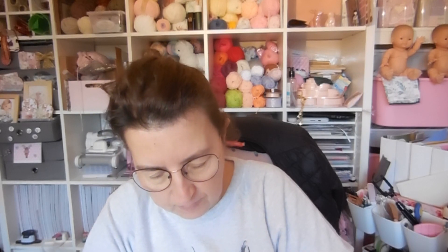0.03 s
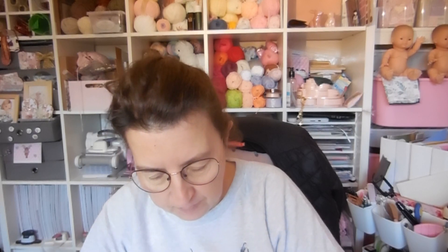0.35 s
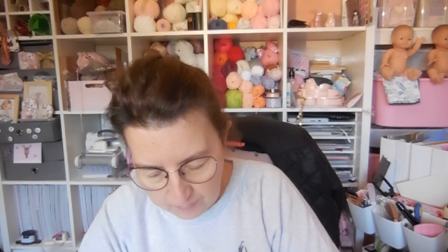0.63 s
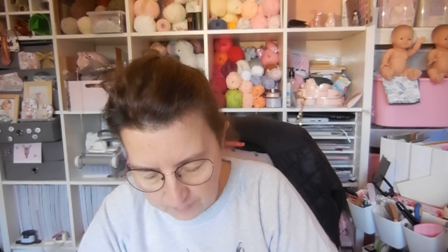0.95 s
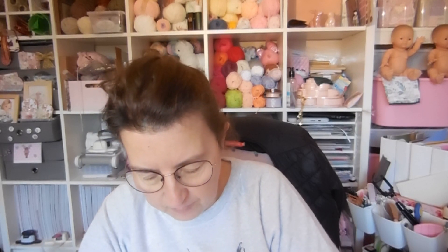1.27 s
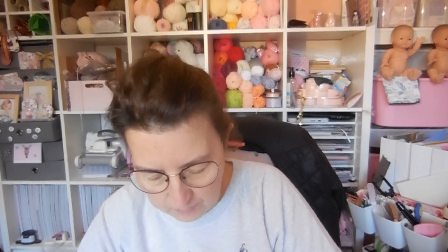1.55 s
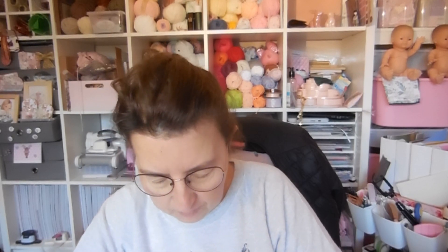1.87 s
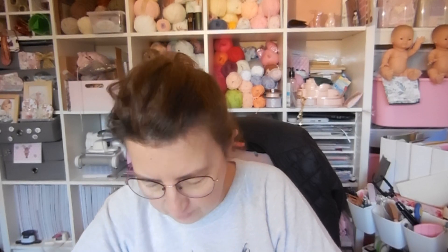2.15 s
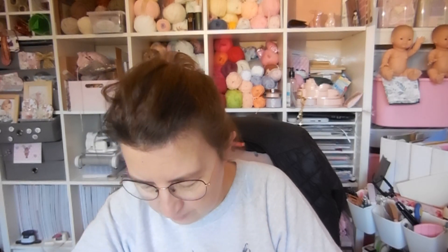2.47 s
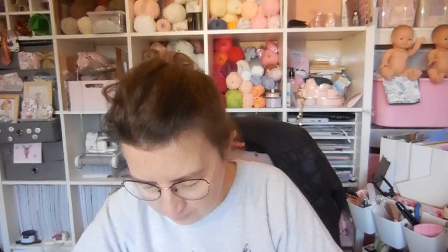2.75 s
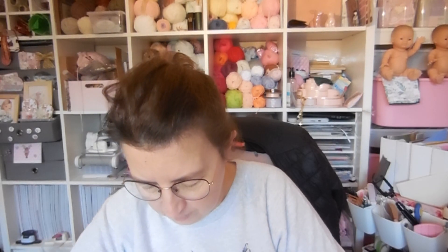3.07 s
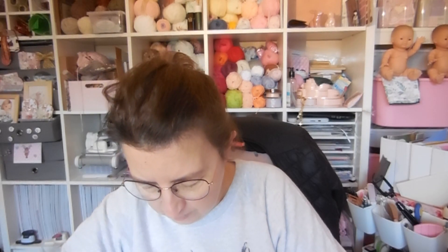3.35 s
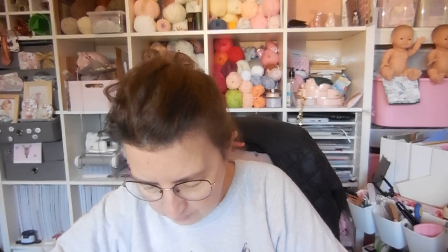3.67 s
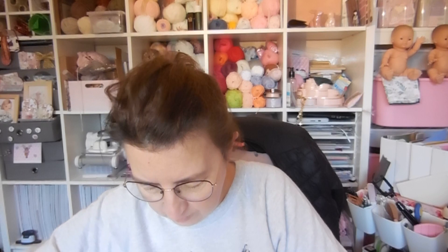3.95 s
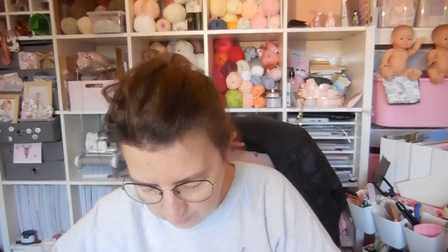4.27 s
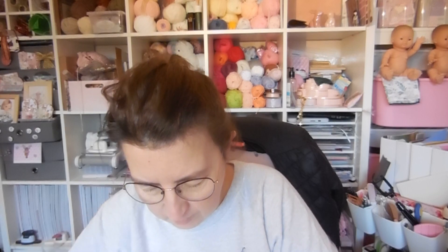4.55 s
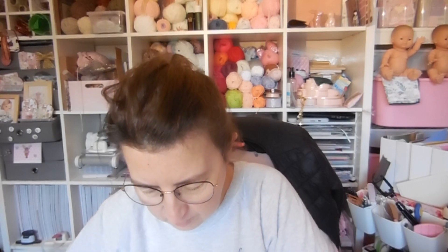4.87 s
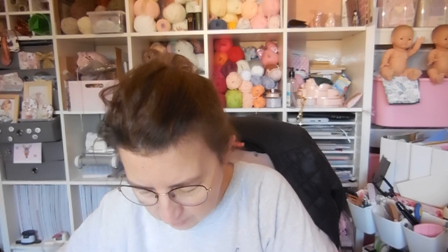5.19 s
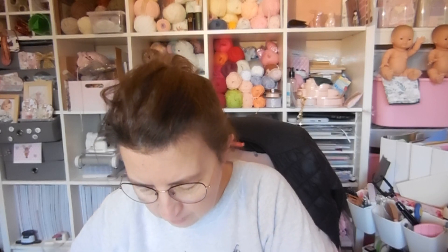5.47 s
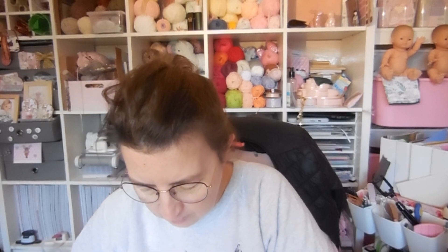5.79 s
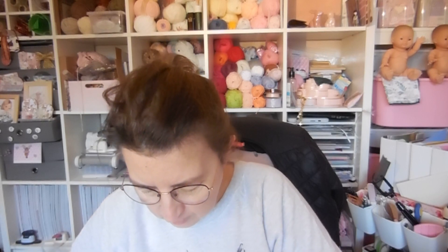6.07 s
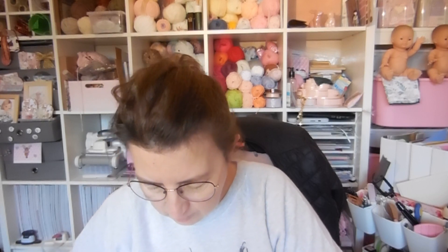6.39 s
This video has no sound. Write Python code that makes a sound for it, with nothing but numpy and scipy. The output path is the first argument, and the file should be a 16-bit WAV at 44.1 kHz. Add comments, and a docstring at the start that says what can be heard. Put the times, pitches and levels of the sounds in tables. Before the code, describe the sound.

Stiff paper crackles and rustles close to a stereo microphone as a small parcel is unwrapped in a quiet, cluttered room. Light crinkles grow into irregular bursts of crisp clicks, crunching folds and the hiss of paper sliding on paper. The handling eases briefly, comes back at its busiest, then softens a little. A few faint, low bumps come from the nudged parcel.

```python
"""Stiff wrapping paper crackles as a small parcel is unwrapped at a desk, close to two microphones.
Creases loaded by the hands buckle and release their elastic energy as clicks, singly and in crunching
runs. Friction makes the sheet hiss, its flexing pushes air, and the nudged parcel bumps softly.
The desk and shelves of the cluttered room return brief reflections over a faint hush."""
import sys
import numpy as np
from scipy import signal
from scipy.fft import rfft, irfft, next_fast_len
from scipy.io import wavfile
from scipy.ndimage import uniform_filter1d, minimum_filter1d, map_coordinates

SR = 44100
rng = np.random.default_rng(int(sys.argv[2]) if len(sys.argv) > 2 else 0)


def transcribe(u):
    """Save the signal u as a 16-bit wav file named by the first command-line argument.

    u: samples, shape (n,) or (channels, n), limited to [-1, 1]; the rate is SR.
    q: integer samples, one column per channel.
    """
    v = np.clip(np.atleast_2d(u).T, -1, 1)
    q = np.round(v * 32767).astype(np.int16)
    wavfile.write(sys.argv[1], SR, q)


N = 283563
TIME = np.arange(N) / SR
HAND_TIME = TIME[::64]  # coarse grid for the slow motion of the hands

# Pulls and pushes on the paper; all levels are relative. Each row: start in seconds, length in seconds,
# level in dB, swell in dB, crispness in dB per octave, ring of taut panels in dB, flexing in dB.
HAND_STROKES = [(-0.025, 0.13, -43, -6, 0, 1, -27), (0.135, 0.14, -34, -9, -0.9, -2, -29),
                (0.339, 0.035, -38, -3, -1, -3, -26), (0.447, 0.069, -44.5, 4, -1.5, -1.5, -24),
                (0.625, 0.28, -42.5, -2, -0.9, -2, -24), (0.931, 0.11, -27, 7.5, 0.5, 0, -25),
                (1.068, 0.14, -25, -0.5, 0.7, 1.5, -22), (1.246, 0.063, -27.5, -10.5, 0.5, -1, -21),
                (1.334, 0.042, -21.5, 2.5, 0.8, 2, -25), (1.421, 0.29, -35.5, -18, -0.4, -2, -27),
                (1.68, 0.16, -35, -1, -0.1, -0.5, -32), (1.795, 0.38, -29.5, -2, -0.5, -2, -24.5),
                (2.216, 0.13, -44, 1, -0.5, -5, -20.5), (2.38, 0.14, -36.5, 2, 0.1, -1.5, -24),
                (2.544, 0.13, -28.5, -4.5, -0.5, -2, -29), (2.69, 0.1, -31.5, 3.5, 0.5, -0.5, -25),
                (2.817, 0.29, -37.5, -7, 0, -1, -23), (3.051, 0.1, -30, 1.5, 0.1, -3, -22.5),
                (3.217, 0.35, -29.5, -6.5, -0.5, -1, -23), (3.481, 0.2, -25.5, 6, -0.5, -3.5, -18.5),
                (3.675, 0.22, -25, -5, 0.3, -2, -19), (3.975, 0.18, -25.5, 16.5, 1.5, -1.5, -23),
                (4.246, 0.052, -34, -3, 0.3, -1, -22), (4.485, 0.066, -53.5, 14, 0, -3.5, -25),
                (4.579, 0.063, -28, -3.5, -1.2, -3.6, -19), (4.648, 0.22, -27.5, 2, -0.1, -2, -20.5),
                (4.858, 0.15, -21.5, -4, 0.8, -2.5, -17), (5.032, 0.25, -21.5, -5, 0.2, -1, -16),
                (5.304, 0.09, -27.5, -7.5, 0.5, 0, -18.5), (5.458, 0.14, -27.5, 9, 0.5, 1.5, -17.5),
                (5.677, 0.38, -35, -18.5, 0, 0, -19.5), (6.005, 0.16, -32, 6, 0, -0.5, -18),
                (6.183, 0.077, -36, 6, 0, -1, -16), (6.345, 0.084, -34, 15, -1, -0.5, -18)]
# Folds collapsing in runs of tiny buckles. Each row: middle in seconds, level in dB, length in seconds.
FOLD_COLLAPSES = [(0.04, -54, 0.029), (0.118, -31.5, 0.026), (0.321, -29.5, 0.0073), (0.546, -39.5, 0.037),
                  (0.72, -34, 0.023), (0.726, -25, 0.032), (0.839, -30.5, 0.024), (0.94, -23.5, 0.014),
                  (1.005, -23, 0.039), (1.175, -22.5, 0.012), (1.394, -19.5, 0.022), (1.498, -27, 0.015),
                  (1.703, -23.5, 0.015), (1.848, -27, 0.023), (2.4, -28.5, 0.047), (2.474, -20.5, 0.018),
                  (2.77, -30.5, 0.029), (2.884, -31.5, 0.017), (3.022, -29, 0.02), (3.213, -34, 0.017),
                  (3.333, -19, 0.0063), (3.865, -16.5, 0.017), (3.967, -24, 0.026), (4.023, -15.5, 0.044),
                  (4.162, -24, 0.034), (4.229, -29.5, 0.013), (4.39, -36, 0.0054), (4.59, -26.5, 0.033),
                  (5.12, -18, 0.054), (5.682, -27, 0.022)]
# Big creases snapping through. Each row: time in seconds, level in dB, crispness in dB per octave,
# note of the flipping facet in Hz.
BIG_CREASES = [(0.0315, -28.5, 0, 10500), (0.0427, -32, -7, 2160), (0.078, -28.5, 0, 6360),
               (0.1106, -33, -1, 3980), (0.1291, -28, -3, 7260), (0.1815, -33.5, 1.5, 6900),
               (0.2553, -19.5, 1, 5500), (0.3936, -35.5, -3, 12200), (0.4252, -38, -2.5, 3200),
               (0.5394, -33.5, 3, 8250), (0.7087, -26.5, 4, 13500), (0.7338, -22.5, -2, 8550),
               (0.8435, -29.5, 1, 8500), (0.895, -35, -2, 8100), (0.9344, -26.5, -3, 2860),
               (0.9518, -24, 11, 4600), (0.9928, -21, 8, 5700), (1.0206, -17.5, -1, 3100),
               (1.091, -20, 2, 11000), (1.098, -21.5, 3, 5400), (1.1127, -25, -1.5, 2980),
               (1.18, -18, -2.5, 2520), (1.293, -24, 2, 4130), (1.352, -22.5, 4, 7140),
               (1.5075, -15.5, 1.5, 1480), (1.5231, -22, -2.5, 1610), (1.707, -21, -2, 8500),
               (1.8416, -20, 4, 3800), (1.8837, -24.5, -1, 6900), (1.9874, -23, -2, 13500),
               (2.0336, -22.5, 4, 4100), (2.037, -25.5, -5, 11000), (2.1925, -27, 0, 13600),
               (2.2603, -33, 1, 8500), (2.2734, -25, -2, 13700), (2.3882, -30, 1, 2300),
               (2.4754, -21, 12, 5500), (2.5349, -28.5, -1, 13800), (2.5807, -24.5, 6, 13000),
               (2.6432, -23.5, -3, 4400), (2.711, -23.5, 0, 7500), (2.7297, -22, 2, 4600),
               (2.7413, -21.5, 1, 10500), (2.7628, -21, -0.5, 13500), (2.804, -26, 6, 9450),
               (2.876, -25.5, -1, 3830), (2.8905, -27.5, -0.5, 4600), (2.938, -22.5, -2, 8640),
               (2.9722, -27.5, 0.5, 2100), (3.0212, -27, -1, 6300), (3.1721, -22.5, 7, 8500),
               (3.2156, -25.5, -4, 6300), (3.235, -27, -0.5, 1680), (3.3305, -22, -5.5, 7300),
               (3.3782, -24.5, -0.5, 2070), (3.4108, -24.5, 1.5, 12900), (3.5238, -22.5, 4, 4900),
               (3.5372, -19, 0.5, 1020), (3.5864, -18, -1.5, 2740), (3.608, -23, -5.5, 2900),
               (3.623, -17.5, -1.5, 3030), (3.629, -16, 1, 6300), (3.8017, -20, -3.5, 4200),
               (3.8337, -16.5, -3.5, 7300), (3.875, -18.5, -2, 1380), (3.957, -26.5, 1, 8100),
               (4.0303, -13, 2, 3200), (4.094, -17.5, 0, 9900), (4.2343, -30, -2.5, 13500),
               (4.2755, -29.5, 1, 4530), (4.283, -28, -2, 12800), (4.3895, -30, -4.5, 1110),
               (4.5777, -28, 5, 5700), (4.698, -24, 1.5, 3620), (4.8198, -22.5, -0.5, 13500),
               (4.9374, -12, -1, 4200), (5.1394, -26, -4, 3200), (5.2, -21, -3, 2400),
               (5.274, -21.5, -7, 2070), (5.3008, -16.5, -0.5, 13500), (5.38, -24, 0.5, 9000),
               (5.3981, -19.5, -0.5, 13500), (5.6011, -20, -2, 2580), (5.6227, -20.5, -2.5, 2420),
               (5.6835, -21.5, 0, 2400), (5.8037, -24, -0.5, 5370), (5.8367, -31, 3.1, 2000),
               (5.8912, -27.5, -3, 2020), (6.0505, -27.5, -8, 2300), (6.0692, -24, 0.5, 2460),
               (6.0944, -24.5, 2.6, 8100), (6.1212, -22, 0, 11000), (6.1545, -21.5, -1.5, 13500),
               (6.199, -28, 3, 8500), (6.2226, -25, 0, 10300), (6.2587, -24, 2, 9700),
               (6.281, -27, 0, 2510), (6.3162, -36, -2, 2300), (6.3355, -34, -2, 8100),
               (6.3805, -31, 1, 10400)]
# Nudges of the parcel. Each row: time in seconds, level in dB.
NUDGES = [(0.256, -40.5), (0.993, -38), (1.508, -42), (3.54, -33), (3.877, -45), (5.07, -33)]
# Where the paper is held. Each row: time in seconds, lead at the left microphone in microseconds.
PAPER_PLACE = [(0, 6), (3, 4), (3.85, 17), (4.12, 38.5), (4.56, 8), (5.4, 25), (6.4, 8)]
# Spectra of the four sources. Each row: frequency in Hz, relative spectral density in dB.
PAPER_SPECTRUM = [(150, -49.5), (400, -28.5), (700, -17.5), (950, -6.5), (1200, -4), (1650, -6),
                  (2150, -0.8), (2950, 0.03), (4700, -2.5), (7500, -5), (12800, -6), (14300, -7),
                  (16000, -24)]
FLEX_SPECTRUM = [(25, -36), (70, -21.5), (150, -11), (250, -5), (370, -2.5), (440, 4), (600, 3.5), (800, 6),
                 (1300, -47.5), (4000, -99)]
HUSH_SPECTRUM = [(20, 10), (100, 4.5), (400, 14), (2000, -12), (16000, -13)]
PARCEL_SPECTRUM = [(20, -45), (60, -14), (130, -5), (300, 1), (600, 6.5), (2000, -20)]
# Reverberation time. Each row: frequency in Hz, seconds to decay by 60 dB.
ROOM_T60 = [(150, 0.16), (1000, 0.27), (4000, 0.16), (14000, 0.091)]
# Likeness of the echoes. Each row: frequency in Hz, left-right correlation.
ROOM_COHERENCE = [(100, 0.93), (600, 1), (1200, 1), (2800, 0.32), (4200, 0.091), (8000, 0.045)]
# Microphone sensitivity. Each row: frequency in Hz, left minus right in dB.
MIC_BALANCE = [(200, 0.5), (600, -1), (1900, 0.3), (2800, -0.8), (4000, -5), (5200, -2), (7000, -2.5),
               (9000, 1), (11000, 1.8), (14500, -2.5)]
# Microphone phase. Each row: frequency in Hz, lead of the left in radians.
MIC_PHASE = [(1500, 0.22), (2400, -0.17), (3300, -0.92), (4600, 0.54), (7500, 0.12), (12000, -0.49),
             (15000, -0.3)]

ATTACK_S, RELEASE_DB_PER_S = 0.031, 228  # every stroke takes hold and lets go alike
HELD_DB, USUAL_DB = -52, -29.5  # paper merely held; an ordinary stroke
CRISP_PER_DB, FLEX_LOSS_PER_DB = 0.0765, 0.18  # change of the sheet per dB of extra work
SNAP_GAIN = np.sqrt(SR * .002)  # gives a snap the energy of 2 ms at its level


def amp(db):
    """Amplitude grows tenfold every 20 dB."""
    return 10 ** (np.asarray(db) / 20)


def unit(x):
    """Normalisation to a mean power of 1."""
    return x / np.sqrt(np.mean(x ** 2) + 1e-20)


def along(points, hz):
    """Interpolation of (Hz, value) points on a logarithmic frequency axis."""
    knots_hz, values = np.transpose(points)
    return np.interp(np.log(hz + 1), np.log(knots_hz), values)


def smooth(power, seconds):
    """Short-time average of a power under a triangular window."""
    width = max(1, int(seconds * SR))
    return np.abs(uniform_filter1d(uniform_filter1d(power, width), width))


def wobble(rate):
    """Random modulation with `rate` knots a second."""
    return map_coordinates(rng.standard_normal(N // 8), [TIME * rate], order=1)


def filtered(x, response):
    """Linear filtering: the spectrum is multiplied by a complex frequency response."""
    size = next_fast_len(N + SR // 4)
    return irfft(rfft(x, size) * response(np.fft.rfftfreq(size, 1 / SR)), size)[..., :N]


def ring(x, spectrum, size=2048):
    """A body colours its excitation by convolution with a minimum-phase response of energy 1."""
    cepstrum = irfft(np.log(amp(along(spectrum, np.fft.rfftfreq(size, 1 / SR)))))
    cepstrum[1:size // 2] *= 2
    cepstrum[size // 2 + 1:] = 0
    pulse = irfft(np.exp(rfft(cepstrum)))
    return signal.oaconvolve(x, pulse[None] / np.linalg.norm(pulse), axes=1)[:, :N]


def equal_energy(spectra, hz):
    """Weighted normalisation: all rows carry the same energy once the paper has coloured them."""
    weight = amp(along(PAPER_SPECTRUM, hz)) ** 2
    return spectra / np.sqrt(np.abs(spectra) ** 2 @ weight / weight.sum())[:, None]


def colour(hz, crisp, taut_db, pivot_hz=3500, panel_hz=2750, panel_octaves=0.62, lowest_hz=900):
    """Spectral tilt and resonance: crisp paper is brighter, taut panels ring in the low treble."""
    octaves = np.log2(np.maximum(hz, lowest_hz) / pivot_hz)
    panel = np.exp(-(np.log2((hz + 1) / panel_hz) / panel_octaves) ** 2)
    return amp(crisp[:, None] * octaves + taut_db[:, None] * panel)


def handling(at):
    """Strokes add in power: their total in dB, then power-weighted crispness, ring and flexing."""
    start, length, db, swell_db, *sheet = np.transpose(HAND_STROKES)
    age = at[:, None] - start
    attack = np.clip(age / ATTACK_S, 0, 1)
    hold_db = db + swell_db * (np.clip(age / length, 0, 1) - .5)
    release_db = RELEASE_DB_PER_S * np.maximum(age - length, 0)
    power = (attack * amp(hold_db - release_db)) ** 2 + 1e-12
    total = power.sum(axis=1)
    return 10 * np.log10(total + amp(HELD_DB) ** 2), *(power @ column / total for column in sheet)


def with_crunches(work_db, at):
    """Incoherent addition: each collapsing fold adds a bell curve of power to the level in dB."""
    middle, db, length = np.transpose(FOLD_COLLAPSES)
    folds = amp(db) ** 2 * np.exp(-np.minimum((2 * (at[:, None] - middle) / length) ** 2, 100))
    return 10 * np.log10(amp(work_db) ** 2 + folds.sum(axis=1))


def sheet_state(at):
    """Timbre follows load: harder work makes the paper crisper and lessens the share of flexing."""
    work_db, crisp, taut_db, flex_db = handling(at)
    extra_db = with_crunches(work_db, at) - USUAL_DB
    return crisp + CRISP_PER_DB * extra_db, taut_db, flex_db - FLEX_LOSS_PER_DB * extra_db


def effort(stall_db=1.0, stall_s=0.018, full_db=16):
    """Driving amplitude of strokes and folds; it dips while a big crease resists before snapping."""
    work_db = handling(HAND_TIME)[0]
    level_db = np.interp(TIME, HAND_TIME, with_crunches(work_db, HAND_TIME))
    for time, db, _, _ in BIG_CREASES:
        end = round(time * SR)
        before = np.arange(max(0, end - round(stall_s * SR)), end)
        resistance = np.clip((db - np.interp(time, HAND_TIME, work_db)) / full_db, 0, 1) ** 2
        level_db[before] -= stall_db * resistance * np.sqrt(np.linspace(0, 1, len(before)))
    return amp(level_db)


def buckles(times, db, crisp, taut_db, facet_hz, facet_db, pan_db, life_s, width, size=320):
    """Buckling releases a damped noise burst, reinforced at the note of the facet that flips."""
    t, hz = np.arange(size) / SR, np.fft.rfftfreq(size, 1 / SR)
    draw = rng.standard_normal((len(times), 2 * size + 2))
    noises = draw[:, :size], draw[:, size:-2]
    lean_db = pan_db * draw[:, -2:-1]
    decay_s = (life_s * np.exp(0.24 * draw[:, -1]))[:, None]
    age = np.maximum(t - t[size // 16], 0)
    envelope = np.exp(-age / decay_s) - np.exp(-6 * age / decay_s)
    envelope += amp(-21) * (age > 0) * np.sqrt(1 - age / age[-1])  # nearby folds scatter the burst
    facet = np.exp(-(np.log2((hz + 1) / facet_hz[:, None]) / 0.22) ** 2)
    gain = colour(hz, crisp, taut_db) * amp(facet_db * facet)
    mid, side = [equal_energy(rfft(noise * envelope) * gain, hz) for noise in noises]
    turn = width * hz / (hz + 4000)  # short waves leave a facet differently towards each microphone
    channels = [irfft(mid * np.cos(turn) + sign * side * np.sin(turn))
                * amp(db[:, None] + sign * lean_db / 2) for sign in (1, -1)]
    starts = np.round(times * SR).astype(int) - size // 16
    where = (starts[:, None] + np.arange(size)).clip(0).ravel()
    bursts = np.array([np.bincount(where, channel.ravel(), N)[:N] for channel in channels])
    return ring(bursts, PAPER_SPECTRUM)


def crackle(drive, count=4200, spread_db=6, crowding=0.29, crisp_scatter=0.78, level_db=-4):
    """Small creases share the energy of the hands: a few stand out in light work, many in hard work."""
    times = rng.uniform(0, N / SR, count)
    facet_hz = np.exp(rng.uniform(np.log(1500), np.log(14000), count))
    strength, tilt = rng.standard_normal((2, count))
    strength = strength.clip(-3, 1.6)
    work_db = handling(times)[0]
    db = strength * (spread_db - crowding * (work_db - work_db.mean()))
    crisp, taut_db, _ = sheet_state(times)
    crisp = crisp + crisp_scatter * tilt + .5 * strength  # strong buckles are sharper
    grains = buckles(times, db, crisp, taut_db, facet_hz, facet_db=6.5, pan_db=2, life_s=0.001, width=0.59)
    power = smooth(np.mean(grains ** 2, axis=0), seconds=0.099)
    return amp(level_db) * drive * grains / np.sqrt(power + 1e-4)


def rubbing(drive, level_db=-7, rough_db=3, crisp_bias=-2.9, width=0.23):
    """Stick-slip friction: paper sliding on paper makes a duller, uneven hiss."""
    hz, t, spectra = signal.stft(rng.standard_normal((2, N)), SR, nperseg=256)
    crisp, taut_db, _ = sheet_state(t)
    spectra *= equal_energy(colour(hz, crisp + crisp_bias, taut_db), hz).T
    spectra[1] *= width * (hz / (hz + 4000))[:, None]
    mid, side = signal.istft(spectra, SR, nperseg=256)[1][:, :N]
    friction = np.array([mid + side, mid - side]) * amp(rough_db * wobble(220))
    return amp(level_db) * drive * unit(ring(friction, PAPER_SPECTRUM))


def flexing(drive, level_db=-3.5, flutter_db=4, width=0.29):
    """Radiation from bending: broad parts of the sheet flap and push air at low frequencies."""
    flaps = rng.standard_normal(N) + width * rng.standard_normal((2, N))
    flaps *= amp(flutter_db * wobble(90))
    flex_db = np.interp(TIME, HAND_TIME, sheet_state(HAND_TIME)[2])
    return drive * amp(flex_db + level_db) * unit(ring(flaps, FLEX_SPECTRUM))


def still_air(level_db=-72):
    """Ambient noise: a faint, steady hush, mostly common to both channels."""
    hush = rng.standard_normal(N) + .5 * rng.standard_normal((2, N))
    return amp(level_db) * unit(ring(hush, HUSH_SPECTRUM))


def reflections(x, count=130, early_db=3, early_fade_s=0.0056, gap_s=0.0025):
    """Dense reflections off desk and shelves decay in a short tail; paths change as the paper moves."""
    wet, hop = np.zeros((2, 2 * N)), N // count
    for start in range(-hop, N, hop):  # a fresh random response for each overlapping stretch
        hz, t, (mid, side) = signal.stft(rng.standard_normal((2, SR // 6)), SR, nperseg=256)
        turn = np.arccos(np.clip(along(ROOM_COHERENCE, hz), -1, 1))[:, None] / 2
        spectra = np.array([mid * np.cos(turn) + sign * side * np.sin(turn) for sign in (1, -1)])
        decay = amp(-60 * t / along(ROOM_T60, hz)[:, None])
        tail = signal.istft(spectra * decay, SR, nperseg=256)[1]
        age = TIME[:tail.shape[1]]
        tail *= np.clip(age / gap_s - .5, 0, 1) * (1 + amp(early_db) * np.exp(-age / early_fade_s))
        span = np.arange(max(start, 0), min(start + 2 * hop, N))
        part = x[span] * np.sin(np.pi * (span - start) / (2 * hop))
        echo = signal.fftconvolve(part[None], tail / np.linalg.norm(tail[0]), axes=1)
        wet[:, span[0]:span[0] + echo.shape[1]] += echo
    return wet[:, :N]


def big_snaps(level_db=1.98, life_s=0.00091, growth=0.29, haste=0.45):
    """Snap-through of big creases: strong ones last longer, crisp ones are quick."""
    times, db, crisp, facet_hz = np.transpose(BIG_CREASES)
    lives = life_s * amp(growth * (db - db.mean()) - haste * crisp)
    facet_db = 8.5 + 1.5 * np.maximum(np.log2(5000 / facet_hz), 0)  # low facets ring more clearly
    taut_db = sheet_state(times)[1]
    return SNAP_GAIN * buckles(times, db + level_db, crisp, taut_db, facet_hz, facet_db[:, None],
                               pan_db=0, life_s=lives, width=0.28)


def lesser_snaps(count=130, over_db=2.5, spread_db=2, crowding=0.15, crisp_scatter=2):
    """Middling creases buckle at random, near the level of the rustle; hard work masks them more."""
    when, pitch, strength, tilt = rng.uniform(0, 1, (count, 4)).T
    times = when * N / SR
    facet_hz = 1800 * (13000 / 1800) ** pitch
    work_db = handling(times)[0]
    db = work_db + over_db - crowding * (work_db - USUAL_DB) + spread_db * (2 * strength - 1)
    crisp, taut_db, _ = sheet_state(times)
    crisp = crisp + crisp_scatter * (2 * tilt - 1)
    return SNAP_GAIN * buckles(times, db, crisp, taut_db, facet_hz,
                               facet_db=8, pan_db=4, life_s=0.0011, width=1)


def bumps(level_db=20):
    """Impulse response: each nudge draws one low thud from the parcel."""
    pushes = np.zeros((1, N))
    for time, db in NUDGES:
        pushes[0, round(time * SR)] = amp(db + level_db)
    return ring(pushes, PARCEL_SPECTRUM)


def placed(x, shadow_db_per_cycle=3.5):
    """Path difference and shadowing: the nearer microphone hears the paper earlier and brighter."""
    hz, t, spectra = signal.stft(x, SR, nperseg=256)
    lead_us = np.interp(t, *np.transpose(PAPER_PLACE))
    cycles = hz[:, None] * lead_us / 1e6
    left = np.exp(1j * np.pi * cycles) * amp(shadow_db_per_cycle * cycles)
    return signal.istft(spectra * np.array([left, 1 / left]), SR, nperseg=256)[1][:, :N]


def scene():
    """Superposition of the direct sound, its reflections and the hush of the room."""
    drive = effort()
    rustle = crackle(drive) + rubbing(drive) + flexing(drive)
    hits = big_snaps() + lesser_snaps() + bumps()
    echoes = reflections(np.mean(amp(-11.5) * rustle + amp(-8) * hits, axis=0))
    return placed(rustle + hits) + echoes + still_air()


def record(dry, ceiling=.5, top_hz=16100):
    """Transduction: two microphones unequal in gain and phase, a quick peak limiter, a steep low-pass."""
    sides = np.array([[.5], [-.5]])
    heard = filtered(dry, lambda hz: amp(sides * along(MIC_BALANCE, hz))
                     * np.exp(1j * sides * along(MIC_PHASE, hz)))
    safe_gain = np.minimum(1, ceiling / (np.abs(heard).max(axis=0) + 1e-9))
    limited = heard * uniform_filter1d(minimum_filter1d(safe_gain, size=65), size=65)
    return filtered(limited, lambda hz: 1 / np.sqrt(1 + (hz / top_hz) ** 200))


dry = scene()
out = record(dry)
transcribe(out)
```